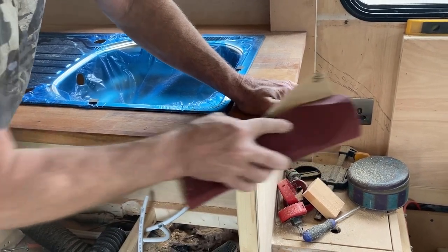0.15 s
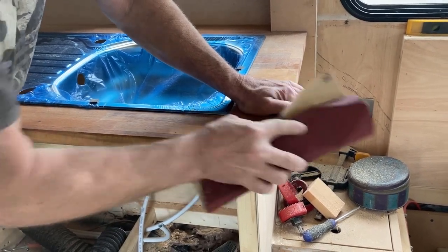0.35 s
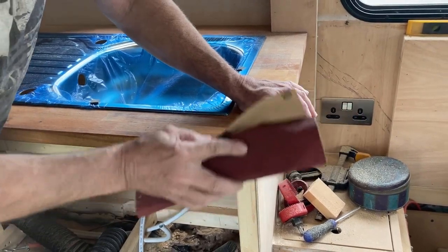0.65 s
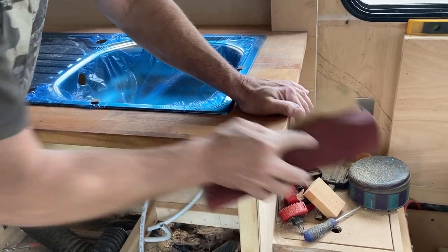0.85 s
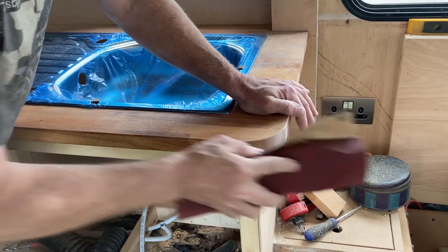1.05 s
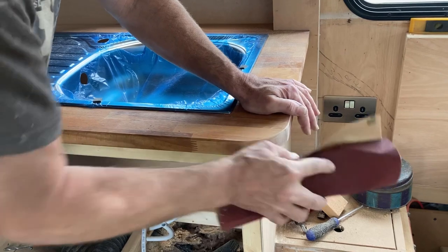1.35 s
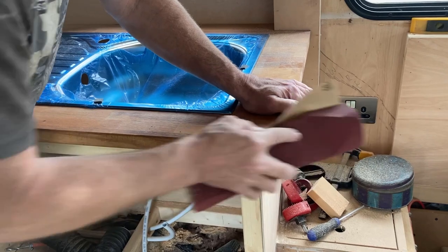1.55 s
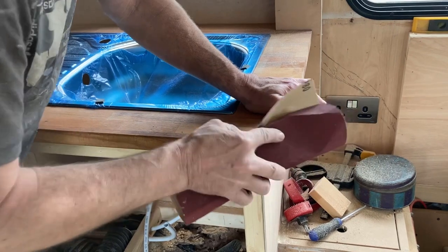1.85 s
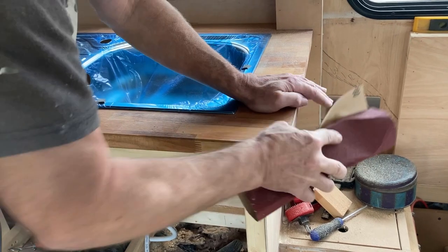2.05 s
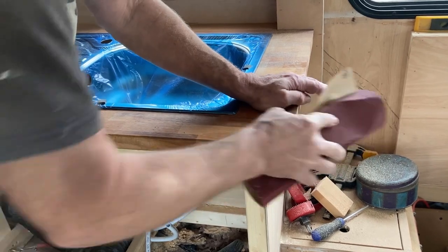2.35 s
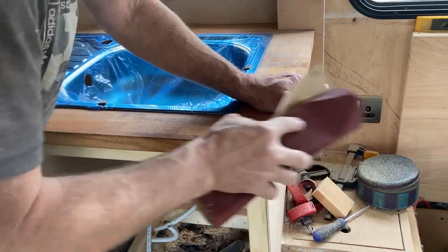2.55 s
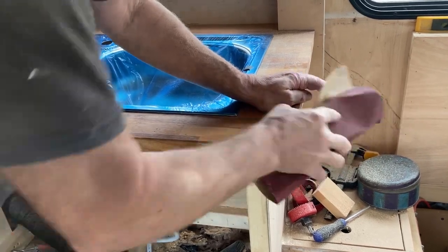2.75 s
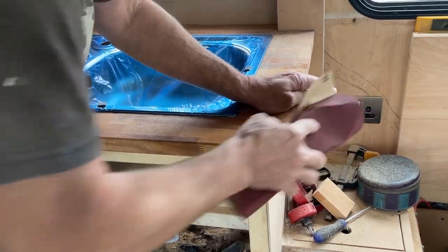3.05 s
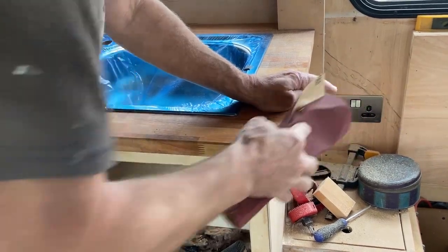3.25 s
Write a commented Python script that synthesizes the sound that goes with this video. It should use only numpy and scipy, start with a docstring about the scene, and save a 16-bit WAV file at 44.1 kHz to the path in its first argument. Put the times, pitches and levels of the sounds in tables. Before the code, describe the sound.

Sandpaper rubs a wooden worktop edge by hand in a small room, close in stereo. Three soft short rubs to 0.26 s, then gritty strokes starting near 0.27, 0.76, 1.15, 1.5, 1.87, 2.2 and 2.6 s, each accelerating to a bright rasp and cutting off; the second is loudest, near 0.87. Hollow knocks fall around strokes; three quick, steadier rubs follow from 3.0 s. Faint brushing, low rumble.

```python
"""In a small panelled room, a block wrapped in sandpaper is worked by hand over the edge of a wooden worktop.
Rasp, hiss and scratches are made of random grain clicks: short rubs swell and fade, long strokes speed up
into a bright rasp and run off the corner. Knocks are short pulses that make the worktop and its cabinet boom.
A low rumble, light brushing and quiet noise lie beneath, and echoes carry it all to two microphones."""
import sys
import numpy as np
from scipy import signal
from scipy.fft import rfft, irfft, next_fast_len
from scipy.io import wavfile

SR = 44100
rng = np.random.default_rng(int(sys.argv[2]) if len(sys.argv) > 2 else 0)


def file_out(sig):
    """Save sig as 16-bit WAV at sys.argv[1]."""
    # one column per channel
    cols = np.atleast_2d(sig).T
    # limit, then scale
    lim = np.clip(cols, -1, 1)
    pcm = np.round(lim * 32767).astype(np.int16)
    wavfile.write(sys.argv[1], SR, pcm)


N = 149940
T = np.arange(N) / SR   # time in seconds
SIZE = next_fast_len(N + SR // 2, True)   # room for the echo tail
FREQS = np.maximum(np.arange(SIZE // 2 + 1) * SR / SIZE, 1)

# echoes of the room in each pitch range: pitch_hz, t60_s (time to fade by 60 dB), level_db
ROOM_ECHOES = [(59.7, 0.2, -4.5), (237, 0.41, -10.5), (600, 0.32, -6.5), (1500, 0.22, -3), (4200, 0.24, -1),
               (9700, 0.18, -3.5), (16200, 0.19, -8.5)]


def amp(db):
    """Turn decibels into gain."""
    return 10 ** (np.asarray(db) / 20)


def rms_one(x):
    """Scale a sound to an average strength (rms) of 1."""
    return x / np.sqrt(np.mean(x ** 2) + 1e-20)


def at_hz(points, hz, column=1):
    """Read a table between its points, with pitch on a log axis."""
    p = np.array(points)
    return np.interp(np.log(hz), np.log(p[:, 0]), p[:, column])


def colour(x, spectrum):
    """Give a sound this spectrum with a filter that never rings ahead; white noise keeps its power."""
    cepstrum = irfft(np.log(rms_one(amp(at_hz(spectrum, FREQS)))), SIZE)
    # folding the second half onto the first makes the filter minimum phase
    cepstrum[1:SIZE // 2] *= 2
    cepstrum[SIZE // 2 + 1:] = 0
    response = np.exp(rfft(cepstrum))
    return irfft(rfft(x, SIZE) * response, SIZE)[:N]


def cut(x, hz, kind, order=2):
    """Keep the lows, the highs or a band with a Butterworth filter."""
    sos = signal.butter(order, hz, kind, fs=SR, output="sos")
    return signal.sosfilt(sos, x + 1e-18)


def drift(rate_hz):
    """Random wandering, no faster than about the given rate, with rms 1."""
    return rms_one(cut(rng.standard_normal(N + SR), rate_hz, "low")[SR:])   # drop the filter's first second


def dying(t60_s):
    """A half-second burst of noise that dies away, with unit energy."""
    t = T[:SR // 2]
    burst = rng.standard_normal(len(t)) * amp(-60 * t / t60_s)
    return rms_one(burst) / np.sqrt(len(t))


def add(out, start_s, x):
    """Mix a sound in at a time."""
    i = int(start_s * SR)
    out[i:i + len(x)] += x[:N - i]


def ring(force, hz, t60_s):
    """One damped resonance, which swings on after each push."""
    r, w = amp(-60 / (t60_s * SR)), 2 * np.pi * hz / SR
    return signal.lfilter([0, np.sin(w)], [1, -2 * r * np.cos(w), r * r], force + 1e-18)


def quiet_room():
    """Steady, very soft coloured noise for the quiet of the room."""
    # pitch_hz, level_db
    spectrum = [(20, -3), (45, -12), (70, -18), (130, -16), (300, -21), (1000, -27), (4000, -38),
                (16000, -45)]
    return amp(-77) * colour(rng.standard_normal(N), spectrum)


def echoes():
    """The short diffuse stereo tail of the small room, one band at a time, as a frequency response."""
    # left-right likeness of the echoes: pitch_hz, likeness (1 is alike, -1 is opposite)
    likeness = [(100, .97), (300, .8), (700, .3), (1500, -.3), (3000, -.1), (4500, .1), (6200, .85),
                (8000, 1), (16000, 1)]
    t = T[:SR // 2]
    edges = np.geomspace(30, 20000, 15)
    tail = 0
    for low, high in zip(edges, edges[1:]):
        hz = np.sqrt(low * high)
        fade = amp(-60 * t / at_hz(ROOM_ECHOES, hz)) * (t > .002)   # echoes start after 2 ms
        noise = rng.standard_normal((2, len(t))) * fade / np.linalg.norm(fade)
        mid, side = cut(noise, [low, high], "band")
        alike = np.clip(at_hz(likeness, hz), -1, 1)
        shared = np.sqrt((1 + alike) / 2) * mid
        opposed = np.sqrt((1 - alike) / 2) * side * [[1], [-1]]
        tail = tail + amp(at_hz(ROOM_ECHOES, hz, column=2)) * (shared + opposed)
    return rfft(tail, SIZE)


def room(x):
    """Direct sound and echoes that shift with the movement reach two microphones with a phase between them."""
    # phase by which the left microphone leads: pitch_hz, lead_radians
    left_lead = [(100, 0), (200, .2), (400, .45), (900, .8), (1500, 0), (4100, .3), (5500, 1.4), (6900, 0),
                 (8300, -2.1), (9200, -3.14), (9700, -3.6), (11000, -6), (11800, -6.6), (13100, -8.9),
                 (13800, -9.42), (14500, -10), (15800, -12.4)]
    # level of left over right: pitch_hz, level_db
    left_gain = [(50, -.6), (150, -1.5), (350, 1), (700, 2.4), (1400, 2.8), (2800, 2), (5000, 0),
                 (16000, 0)]
    # the echoes change as arm and block move: a random blend of two tails
    wander_rate_hz, wander_radians = 4.53, 1.81
    place = wander_radians * drift(wander_rate_hz)
    wet = rfft(x * np.cos(place), SIZE) * echoes() + rfft(x * np.sin(place), SIZE) * echoes()
    phase = np.array([np.ones(len(FREQS)), np.exp(-1j * at_hz(left_lead, FREQS))])
    balance = amp(at_hz(left_gain, FREQS) * [[.5], [-.5]])
    # make up for the power that the echoes add
    gain = balance / np.sqrt(1 + amp(at_hz(ROOM_ECHOES, FREQS, column=2)) ** 2)
    return irfft((rfft(x, SIZE) + wet) * phase * gain, SIZE)[:, :N]


def grit():
    """Grains of many sizes catch and tear wood fibres: random clicks of either sign, rms 1."""
    grains_per_s, size_spread_db = 22000, 4
    sizes = amp(size_spread_db * np.minimum(rng.exponential(1, N), 6)) * rng.choice([-1, 1], N)
    return rms_one(sizes * (rng.random(N) < grains_per_s / SR))


def brushing(edge_s=0.0036):
    """The steadying hand and the loose paper slide lightly, with short fades at both ends."""
    # light touches: start_s, end_s, level_db
    touches = [(0.729, 0.797, -65), (1.083, 1.15, -70), (1.499, 1.536, -59.5), (2.085, 2.642, -65.5),
               (2.963, 3.004, -49)]
    # pitch_hz, level_db
    spectrum = [(100, -1.5), (1000, 7), (1600, -4), (2450, 3.5), (3000, -4), (4000, -1.5), (5700, -10),
                (6800, -7), (8500, -15.5), (16000, -26)]
    level = np.zeros(N)
    for start, end, db in touches:
        level += amp(db) * np.clip(np.minimum(T - start, end - T) / edge_s, 0, 1)
    return colour(grit() * level, spectrum)


def rumble(friction):
    """The cabinet rocks with the push of the arm and settles slowly: low noise that lags the friction."""
    # pitch_hz, level_db
    spectrum = [(20, -7), (35, 2), (52, 3.5), (90, 4), (125, -12.5), (250, -24.5), (1000, -51)]
    level_db, follows, lag_s = -27.5, 0.52, 0.043   # follows: power of the push
    r = np.exp(-1 / (lag_s * SR))
    push = signal.lfilter([1 - r], [1, -r], friction, zi=[friction[0]])[0]
    noise = rms_one(colour(rng.standard_normal(N), spectrum))
    return amp(level_db) * push ** follows * noise


def wood(force_on_mode):
    """The modes of worktop and cabinet ring, each under its own share of the force."""
    # ways the wood rings: pitch_hz, level_db, t60_s (time to fade by 60 dB)
    modes = [(52.5, -24, 0.98), (90.3, -12.5, 0.33), (146.3, -11.5, 0.19), (250.5, -15, 0.14),
             (295.5, -9, 0.2), (350, -12, 0.069), (423, -12.5, .08), (501.4, -5, 0.14), (618, -15, 0.027),
             (720.5, -9.5, 0.21), (846, -8, 0.061), (1071, -1, 0.078), (1333, -13, 0.16),
             (2713, -6.5, 0.02)]
    out = np.zeros(N)
    for k, (hz, db, t60) in enumerate(modes):
        out += (-1) ** k * amp(db) * ring(force_on_mode(), hz, t60)   # neighbours push opposite ways
    return out


def knocks():
    """Each padded blow lands on a new spot and rings modes and panels differently; hard ones also crush grit."""
    # the block lands on the worktop, and the worktop thumps back as it lifts off: start_s, level_db,
    # brightness_hz (low-pass), bass_db
    bumps = [(0.417, -46, 900, 12), (.773, -26.5, 1500, -39), (.790, -27.5, 650, 4.5),
             (.890, -31, 523, 6.5), (0.904, -22, 297, -2), (0.944, -43, 169, 5), (1.108, -58.5, 1210, 2),
             (1.155, -36, 1570, -17), (1.293, -32.5, 205, 9), (1.516, -29, 1520, 2), (1.531, -32, 600, 5),
             (1.662, -42, 350, 16), (1.870, -29.5, 1100, 4), (2.034, -31.5, 111, 7.5),
             (2.218, -23, 1310, -29.5), (2.241, -28, 480, 4), (2.402, -38.5, 300, 6),
             (2.504, -55, 298, 16.5), (2.627, -30, 1230, 2), (2.644, -21, 439.9, 2.5),
             (2.977, -26.5, 1240, -5), (2.995, -45.5, 450, 17.5)]
    # dense ring of the panels: pitch_hz, level_db
    clatter = [(60, -33), (200, 3), (400, 5), (800, 6), (1080, 0.5), (1600, -6), (2800, -6), (6000, -11),
               (16000, -4.5)]
    bass_hz, mode_spread_db = 220, 4
    panels_db, panels_t60_s, panels_follow_hardness = 32, 0.078, 0.37
    crush_db, crush_t60_s, crush_hz = 7.5, 0.028, 2040
    blows, panels, crush = [], np.zeros(N), np.zeros(N)
    click = np.eye(1, SR // 10)[0]   # a single sample, then silence
    for start, db, hz, bass_db in bumps:
        pulse = cut(click, hz, "low")
        bass = cut(pulse, bass_hz, "low", order=1)
        pulse = amp(db) * (pulse + (amp(bass_db) - 1) * bass)
        blows.append((start, pulse))
        hardness = hz / crush_hz
        panel_ring = signal.fftconvolve(pulse, dying(panels_t60_s))
        add(panels, start, hardness ** panels_follow_hardness * panel_ring)
        add(crush, start, amp(db) * hardness ** 2 * dying(crush_t60_s))

    def force_on_mode():
        """All blows, each with a fresh random strength for this mode."""
        force = np.zeros(N)
        for start, pulse in blows:
            add(force, start, pulse * amp(mode_spread_db * rng.standard_normal()))
        return force

    boom = wood(force_on_mode)
    return boom + amp(panels_db) * colour(panels, clatter) + amp(crush_db) * cut(crush, crush_hz, "high")


def hand_motion():
    """Strength of the friction and of its hiss: strokes speed up and lift off, rubs swell and fade."""
    # long strokes: start_s, full_speed_s, leaves_wood_s, start_level_db, full_speed_level_db, hiss_db
    strokes = [(0.273, 0.381, 0.4, -47.5, -39, 1.5), (0.759, .882, 0.86, -49.5, -24, 0.5),
               (1.15, 1.265, 1.268, -50, -35, 4), (1.507, 1.618, 1.644, -49.5, -32, 0.5),
               (1.870, 1.989, 1.9924, -46, -32.5, 2.5), (2.207, 2.369, 2.372, -48, -36, -1),
               (2.621, 2.769, 2.764, -44.5, -33.5, -3)]
    # short rubs to and fro: start_s, end_s, level_db, hiss_db
    rubs = [(-.1, 0.021, -46.5, -1), (0.014, 0.144, -46, -1), (0.139, 0.258, -45.5, -0.5),
            (2.989, 3.173, -42, -4.5), (3.173, 3.312, -42, -2), (3.324, 3.453, -42.5, -0.5)]
    speed_up, bite_s, lift_db_per_s, rub_shape = 3.35, 0.0092, 423, 0.67
    hiss_growth = 0.36   # extra hiss in dB for each dB of friction
    moves = []
    for start, full, leave, start_db, full_db, hiss_db in strokes:
        speed = np.clip((T - start) / (full - start), 0, 1) ** speed_up
        db = start_db + (full_db - start_db) * speed - lift_db_per_s * np.maximum(T - leave, 0)
        onset = np.clip((T - start) / bite_s, 0, 1)
        moves.append((amp(db) * onset, hiss_db))
    for start, end, db, hiss_db in rubs:
        way = np.clip((T - start) / (end - start), 0, 1)
        moves.append((amp(db) * (4 * way * (1 - way)) ** rub_shape, hiss_db))
    friction = sum(move for move, _ in moves)
    hiss = sum(move * amp(db) * (move / move.max()) ** hiss_growth for move, db in moves)
    return friction, hiss


def scratches(low_hz=950, high_hz=5000, count=26):
    """Coarse grains snap free and ring briefly, at pitches that come and go along the edge; rms 1."""
    snaps_per_s, spread_db, ring_cycles = 290, 5.5, 57   # cycles to fade by 60 dB
    patchy_db, patchy_rate_hz = -0.5, 11.4
    sizes = amp(spread_db * np.minimum(rng.exponential(1, N), 4)) * rng.choice([-1, 1], N)
    snaps = sizes * (rng.random(N) < snaps_per_s / SR)
    dealt = rng.integers(0, count, N)   # which pitch each snap gets
    out = np.zeros(N)
    for k, hz in enumerate(np.geomspace(low_hz, high_hz, count)):
        patches = amp(patchy_db * drift(patchy_rate_hz))
        out += ring(snaps * (dealt == k) * patches, hz, ring_cycles / hz)
    return rms_one(out)


def sanding(friction, hiss):
    """The juddering paper rasps, scratches and hisses along the edge, and its drag shakes the wood."""
    # three spectra, each with pitch_hz, level_db: rasp, left-right difference of the rasp, hiss
    rasp_spectrum = [(40, -39.5), (120, 0.5), (200, 0.5), (350, -2), (520, 3.5), (850, 2), (1100, 1),
                     (1330, 3.5), (1650, -4.5), (2100, -4), (2650, 0), (3500, -5), (5000, -12),
                     (8000, -41.5), (16000, -73)]
    spread_spectrum = [(100, -17.5), (400, -7.5), (800, 4), (1300, 0), (1700, -1), (2600, -7), (4000, -8.5),
                       (6000, -7), (9000, -58), (16000, -61)]
    hiss_spectrum = [(100, 0), (2000, -19), (4000, -3.5), (5500, -7), (7300, -3), (8500, -3.5),
                     (11000, -5.5), (13000, -10), (16000, -11.5)]
    judder_db, judder_rate_hz = 1.94, 40
    scratch_db, spread_db, hiss_db = -13.5, -4.5, -3
    drag_db, drag_follows = -45, 0.76   # follows: power of the friction
    judder = amp(judder_db * drift(judder_rate_hz))
    bite = judder * friction
    drag = grit() * friction ** drag_follows
    rasp = colour(grit() * bite, rasp_spectrum)
    scratching = amp(scratch_db) * bite * scratches()
    spread = amp(spread_db) * colour(grit() * bite, spread_spectrum) * [[1], [-1]]
    hissing = amp(hiss_db) * colour(grit() * judder * hiss, hiss_spectrum)
    shaken_wood = amp(drag_db) * wood(lambda: drag)
    return rasp + scratching + spread + hissing + shaken_wood


def scene():
    """Sanding, knocks, rumble and brushing over the quiet of the room."""
    friction, hiss = hand_motion()
    background = quiet_room() + brushing() + rumble(friction)
    return room(background + knocks() + sanding(friction, hiss))


def record(dry):
    """A steep cut of the top treble, above 15.7 kHz."""
    return signal.sosfilt(signal.ellip(16, .1, 70, 15700, fs=SR, output="sos"), dry)


dry = scene()
out = record(dry)
file_out(out)
```